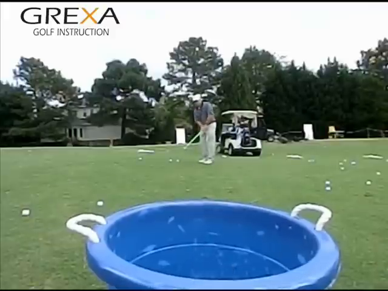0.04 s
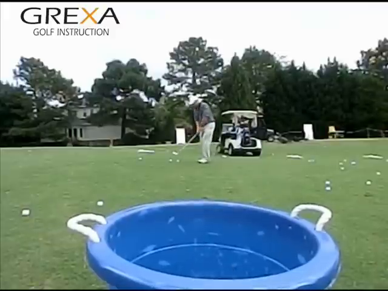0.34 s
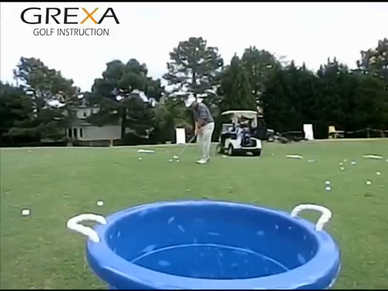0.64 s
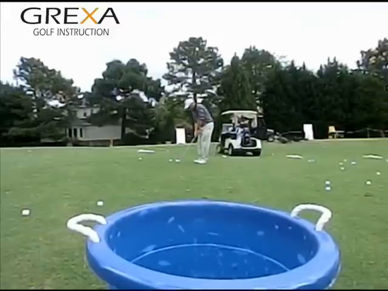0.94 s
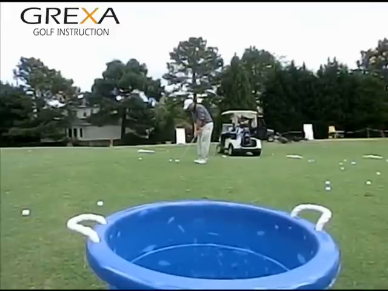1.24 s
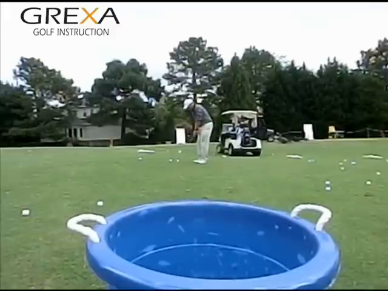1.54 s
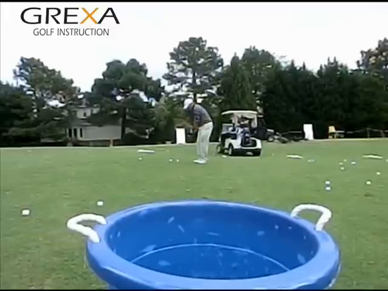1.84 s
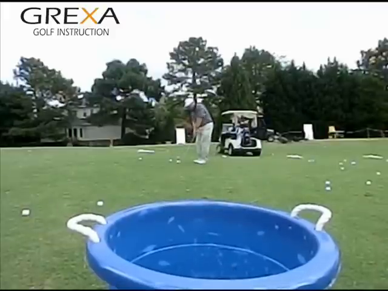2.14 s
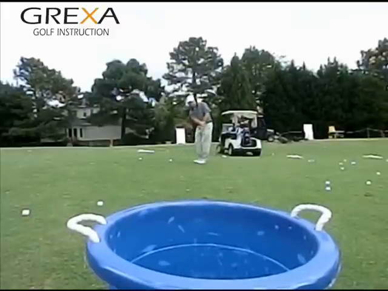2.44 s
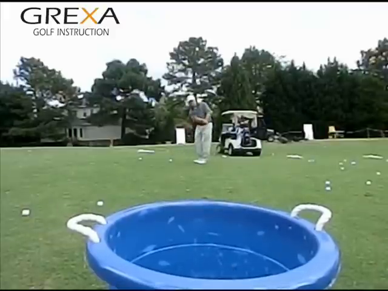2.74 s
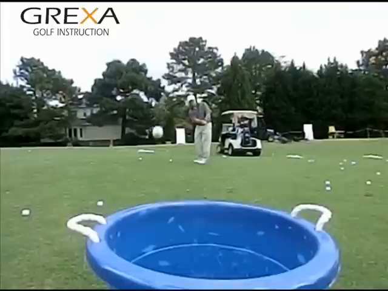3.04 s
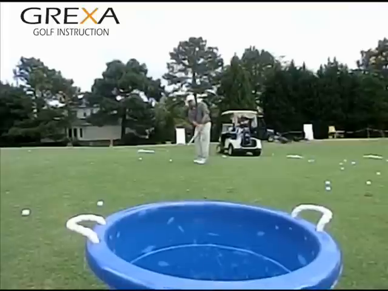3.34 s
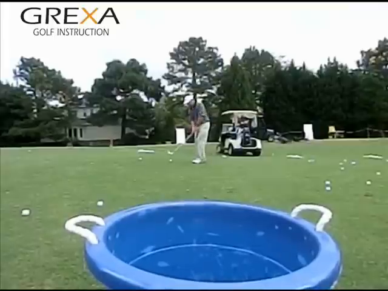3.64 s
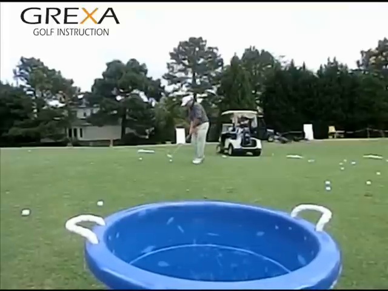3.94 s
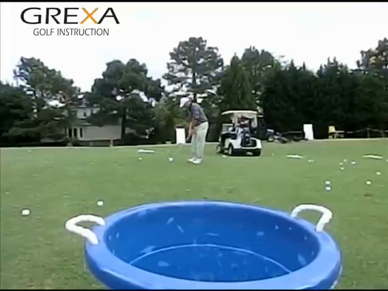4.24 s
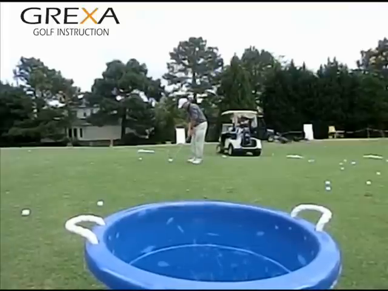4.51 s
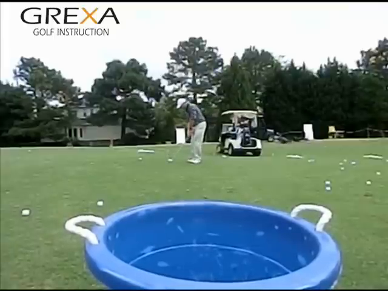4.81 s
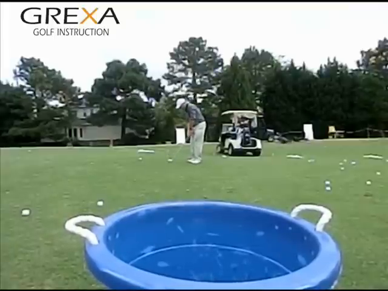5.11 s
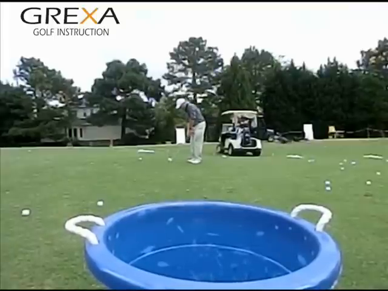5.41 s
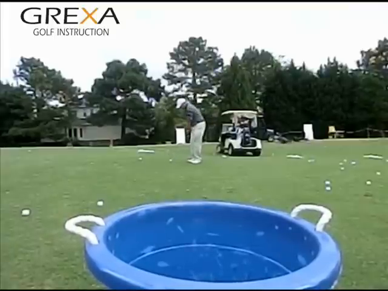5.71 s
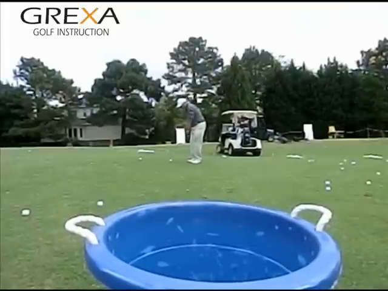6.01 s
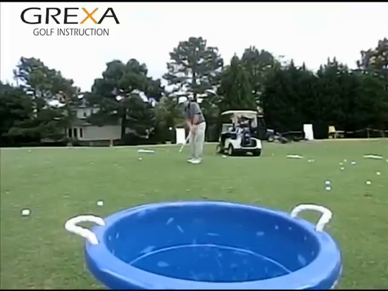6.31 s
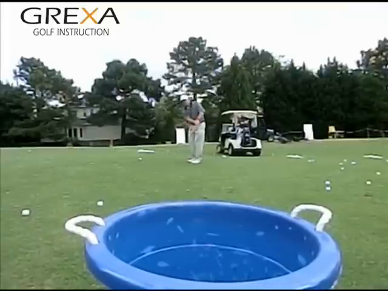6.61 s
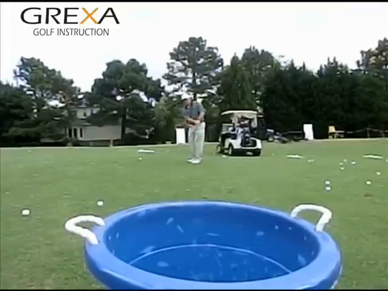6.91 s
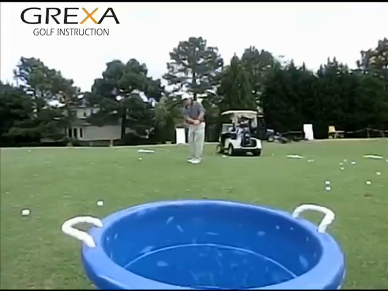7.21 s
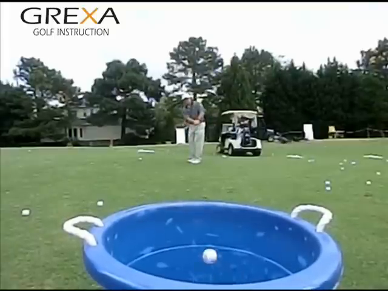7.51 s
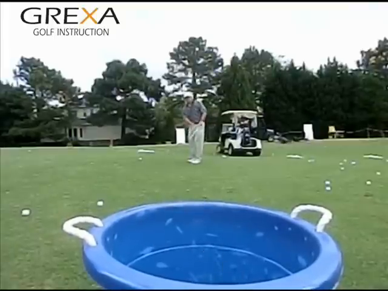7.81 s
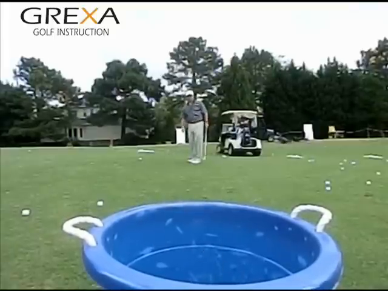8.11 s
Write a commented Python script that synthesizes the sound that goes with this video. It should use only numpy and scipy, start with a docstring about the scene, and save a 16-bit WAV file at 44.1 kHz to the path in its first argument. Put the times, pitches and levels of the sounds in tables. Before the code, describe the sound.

Outdoors on quiet grass, golf balls land in a plastic tub right by the microphone. After some opening hollow bounces, a distant club clicks twice, a few seconds apart, and each shot ends in a loud, booming knock. The first ball rumbles around the wall before settling; the second hits harder and bounces briefly. A soft breeze, insects and faint birds continue underneath.

```python
"""Golf chips into a plastic tub

A club clicks; a second later the ball slams into a tub close to the camera, bounces and rattles,
ringing its wall and floor. One ball circles the wall before it drops. Light wind, insects and
whistling birds lie behind. The slams overload the camera and push its gain down."""
import sys
import numpy as np
from scipy import signal
from scipy.fft import rfft, irfft, next_fast_len
from scipy.io import wavfile
from scipy.ndimage import uniform_filter1d, map_coordinates

SR = 44100
rng = np.random.default_rng(int(sys.argv[2]) if len(sys.argv) > 2 else 0)


def digitize_waveform(pressure):
    """Quantize a signal to 16-bit integers and store it at the path in sys.argv[1].

    Rows of a 2-D input are taken as channels; values are limited to [-1, 1].
    """
    field = np.atleast_2d(pressure).T
    bounded = np.clip(field, -1, 1)
    quanta = np.round(bounded * 32767).astype(np.int16)
    wavfile.write(sys.argv[1], SR, quanta)


N = 359415

# left-right coherence of diffuse and of close sound: (frequency [Hz], coherence [1])
DIFFUSE = [(60, 0.4), (150, 0.6), (380, 0.39), (950, 0.95), (2380, 0.56), (5980, 0.32), (15000, -0.66)]
NEAR = [(200, 1), (1500, .97), (4000, 0.9), (12000, 0.42)]
# spectrum of contact crack and brushed grass: (frequency [Hz], level [dB])
CRACK_SPECTRUM = [(800, -55), (2200, 4), (4500, 1), (6500, -2.5), (11000, -2.5), (15500, -8.5)]


def amp(db):
    """Decibels to gain."""
    return 10 ** (np.asarray(db) / 20)


def unit(x):
    """Scale to rms 1."""
    return x / np.sqrt(np.mean(x ** 2) + 1e-20)


def unit_onset(x):
    """Scale to rms 1 over the first 20 ms."""
    return x / np.sqrt(np.mean(x[..., :SR // 50] ** 2) + 1e-20)


def log_interp(points, hz):
    """Interpolate (Hz, value) points on a log frequency axis."""
    knot_hz, values = np.transpose(points)
    return np.interp(np.log(hz + 1), np.log(knot_hz + 1), values)


def wobble(rate_hz):
    """Smooth random curve with knots at rate_hz."""
    knots = rng.standard_normal(int(N * rate_hz / SR) + 4)
    return map_coordinates(knots, [np.arange(N) * rate_hz / SR])


def filtered(x, response):
    """Zero-phase filter with gain response(hz)."""
    n = x.shape[-1]
    padded = next_fast_len(n + 4096)
    return irfft(rfft(x, padded) * response(np.fft.rfftfreq(padded, 1 / SR)), padded)[..., :n]


def noise(spectrum, coherence, size=N):
    """Stereo noise of rms 1 with given spectrum and coherence."""
    def mid_side(hz):
        angle = np.arccos(np.clip(log_interp(coherence, hz), 0, 1)) / 2
        return amp(log_interp(spectrum, hz)) * [np.cos(angle), np.sin(angle)]
    mid, side = filtered(rng.standard_normal((2, size)), mid_side)
    return unit(np.array([mid + side, mid - side]))


def add(track, start_s, sound):
    """Mix sound into track at start_s."""
    part = track[:, max(0, round(start_s * SR)):][:, :sound.shape[-1]]
    part += sound[:, :part.shape[-1]]


def lawn(air_db=-52, insects_db=-63, twitter_db=-72):
    """Even rush of open air, shrill insects and a high twitter that comes and goes."""
    # spectra: (frequency [Hz], level [dB])
    air_spectrum = [(150, -28), (250, -6), (510, -12.5), (576, -16.5), (860, -11), (1500, -12.5),
                    (5830, -28), (7310, -29), (8850, -29.5), (14700, -31), (16000, -37.5)]
    insect_spectrum = [(6000, -34.5), (6900, -14.5), (7300, -10.5), (7700, -16.5), (8600, -28.5),
                       (9500, -42.5)]
    twitter_spectrum = [(7400, -42), (8000, 3.5), (8300, -1), (8700, -8), (9300, -38.5)]
    air = amp(air_db + .13 * wobble(2.6)) * noise(air_spectrum, DIFFUSE)
    insects = amp(insects_db + .55 * wobble(2.3) + wobble(50)) * noise(insect_spectrum, DIFFUSE)
    twitter = amp(twitter_db + 3.8 * wobble(13)) * noise(twitter_spectrum, DIFFUSE)
    return air + insects + twitter


def wind(flutter_db=2):
    """A light breeze rumbles on the microphone, with a few sharper puffs."""
    # breeze strength: (time [s], level [dB])
    strength = [(0, -34), (.35, -41), (1.08, -35.5), (1.5, -41), (1.8, -32.5), (2.35, -31.5), (2.75, -31),
                (2.95, -36), (3.25, -35.5), (3.6, -38), (4.5, -44), (4.85, -34), (5.7, -38), (5.95, -31.5),
                (6.42, -37.5), (6.6, -27), (6.97, -44.5), (8.15, -39)]
    # puffs: (time [s], level [dB], Gaussian sigma [s])
    puffs = [(1.744, -25.5, 0.0076), (1.857, -26, 0.0047), (1.964, -30.5, 0.0073), (2.741, -23, 0.041),
             (3.033, -32.5, 0.0064), (6.212, -21, 0.002)]
    # spectra: (frequency [Hz], level [dB])
    rumble_spectrum = [(12, -29), (25, -8.5), (60, 3), (100, 2), (160, -8), (230, -11.5), (300, -23.5),
                       (450, -42), (900, -90), (2000, -120)]
    puff_spectrum = [(40, -16.5), (140, 5), (250, -7), (450, -23), (900, -49), (3000, -120)]
    t = np.arange(N) / SR
    breeze_gain = amp(np.interp(t, *np.transpose(strength)))
    rumble = unit(amp(flutter_db * wobble(35)) * noise(rumble_spectrum, DIFFUSE))
    puff_gain = sum(amp(db) * np.exp(-((t - at_s) / sigma_s) ** 2 / 2) for at_s, db, sigma_s in puffs)
    return breeze_gain * rumble + puff_gain * noise(puff_spectrum, DIFFUSE)


def whistle(length_s, start_hz, target_hz, glide_s, sag_hz_per_s, fade_db_per_s, edge_s=.03):
    """Pitch and gain of a whistle that glides onto its note, sags and fades."""
    t = np.arange(round(length_s * SR)) / SR
    hz = target_hz + (start_hz - target_hz) * np.exp(-t / glide_s) - sag_hz_per_s * t
    edges = np.clip(np.minimum(t, length_s - t) / edge_s, 0, 1)
    return hz, edges * amp(-fade_db_per_s * t)


def chirp(length_s, mid_hz, drop_hz=350, arch_hz=375):
    """Pitch and gain of a short note that arches over and drops."""
    u = np.linspace(-.5, .5, round(length_s * SR))
    return mid_hz - drop_hz * u - arch_hz * (2 * u) ** 2, np.sqrt(np.abs(np.cos(np.pi * u)))


def birds(trees_t60_s=.38, gain_db=-5):
    """Thin whistles and chirps, raspy where they slide down, smeared by trees round the lawn."""
    # whistles: (start [s], length [s], relative level [dB])
    rising = [(.02, 0.22, -53), (5.125, 0.31, -51.5), (6.955, 0.4, -51)]
    falling = [(1.645, 0.67, -50), (7.63, .6, -54)]
    # their shapes: (start [Hz], target [Hz], glide [s], sag [Hz/s], fade [dB/s])
    rise = (3170, 4120, .068, 680, 34)
    fall = (6150, 4700, .04, 10, 11)
    # chirps: (middle [s], length [s], pitch [Hz], relative level [dB])
    chirps = [(1.355, .045, 8000, -53), (5.25, .055, 7850, -55), (6.425, .05, 4420, -52),
              (7.16, .07, 8520, -56), (7.28, .1, 4470, -64)]
    notes = [(at_s, db, *whistle(length_s, *rise)) for at_s, length_s, db in rising]
    notes += [(at_s, db, *whistle(length_s, *fall)) for at_s, length_s, db in falling]
    notes += [(mid_s - length_s / 2, db, *chirp(length_s, hz)) for mid_s, length_s, hz, db in chirps]
    song, t = np.zeros((1, N)), np.arange(SR // 2) / SR
    modulation = np.array([1 + .005 * wobble(70), amp(3.6 * wobble(50)), wobble(1100)])
    for at_s, db, hz, gain in notes:
        jitter, flutter, rasp = np.roll(modulation, -round(at_s * SR), axis=1)[:, :len(hz)]
        downslide = np.clip(-np.gradient(hz) * SR / 15000, 0, 1)
        pitch_hz = hz * jitter + 260 * downslide * rasp
        tone = np.sin(2 * np.pi * np.cumsum(pitch_hz) / SR)
        add(song, at_s, (amp(db) * gain * flutter * tone)[None])
    tail = rng.standard_normal((2, len(t))) * amp(-60 * t / trees_t60_s)
    reverb = signal.fftconvolve(song, tail / np.linalg.norm(tail[0]), axes=1)[:, :N]
    return amp(gain_db) * (song + reverb)


def club(head_hz=2300, head_t60_s=.018, click_t60_s=.012, grass_db=-22, grass_t60_s=.12):
    """The club clicks on the ball, rings briefly and brushes the grass."""
    # strokes: (time [s], level [dB], head ring re click [dB])
    strokes = [(2.3327, -25.5, -8), (2.885, -39, -4), (6.3526, -22, -5.5)]
    # (frequency [Hz], level [dB])
    click_spectrum = [(300, -36), (1000, 10), (3500, 1.5), (6000, 0.5), (10000, 6), (15500, -3)]
    out, t = np.zeros((2, N)), np.arange(SR // 5) / SR
    for at_s, db, ring_db in strokes:
        click = noise(click_spectrum, NEAR, len(t)) * amp(-60 * t / click_t60_s)
        ring = amp(ring_db - 60 * t / head_t60_s) * np.sin(2 * np.pi * head_hz * t)
        grass = noise(CRACK_SPECTRUM, DIFFUSE, len(t)) * amp(grass_db - 60 * t / grass_t60_s)
        add(out, at_s, amp(db) * (click + ring + grass))
    return out


def divot(at_s=2.311, level_db=-27.5, t60_s=.15):
    """On one swing the club thumps the ground just before the ball."""
    # (frequency [Hz], level [dB])
    thump_spectrum = [(50, -1.5), (200, -0.5), (350, -6.5), (600, -9), (1500, -16), (5000, -49),
                      (15000, -41)]
    out, t = np.zeros((2, N)), np.arange(SR // 5) / SR
    add(out, at_s, noise(thump_spectrum, NEAR, len(t)) * amp(level_db - 60 * t / t60_s))
    return out


def rim_resonances(x, surge_sigma_s=.018, surge_width=.33):
    """Waves run both ways round the rim: as the ball circles, one comb rises and another falls."""
    # strongest wall resonance: (time [s], frequency [Hz])
    peak_track = [(3.45, 520), (3.55, 980), (3.8, 630), (3.92, 900), (4, 720), (4.07, 1000), (4.16, 740),
                  (4.38, 615), (4.78, 590)]
    # surges around it: (time [s], boost [dB])
    surges = [(3.66, 2), (3.84, 4.5), (4.05, 11), (4.385, 5.5), (4.6, 6), (4.77, -0.5)]
    hz, t, spectrum = signal.stft(x, SR, nperseg=1024, noverlap=768)
    hz = hz[:, None]
    rising = np.cos(2 * np.pi * (hz - 2100 * t) / 560)
    falling = np.cos(2 * np.pi * (hz + 1700 * t) / 430)
    combs_db = np.clip(hz / 900, 0, 1) * (3.8 * rising + 3 * falling)
    offset = hz / np.interp(t, *np.transpose(peak_track)) - 1
    peak_db = 8.5 * np.exp(-(offset / .09) ** 2)
    surge_db = sum(db * np.exp(-((t - at_s) / surge_sigma_s) ** 2 / 2) for at_s, db in surges)
    gain = amp(combs_db + peak_db + surge_db * np.exp(-(offset / surge_width) ** 2))
    return signal.istft(spectrum * gain, SR, nperseg=1024, noverlap=768)[1][:, :N]


def roll_envelope(attack_s=.006, skid_s=.05, loss_db_per_s=2, stop_db_per_s=259):
    """Each roll starts with a skid, slowly loses force and stops."""
    # rolls: (start [s], end [s], level [dB], skid boost [dB])
    rolls = [(-.03, 0.015, -32, 4), (0.135, .2, -42, 12.5), (3.368, 4.779, -29, 17.5),
             (4.853, 4.928, -41, 11.5), (7.361, 7.664, -35.5, 27)]
    t, envelope = np.arange(N) / SR, np.zeros(N)
    for start_s, end_s, db, skid_db in rolls:
        age_s = np.maximum(t - start_s, 0)
        lost_db = loss_db_per_s * age_s + stop_db_per_s * np.maximum(t - end_s, 0)
        attack = np.minimum(age_s / attack_s, 1)
        envelope += attack * amp(db + skid_db * np.exp(-age_s / skid_s) - lost_db)
    return envelope


def rolling(bumps_db=2, grit_db=4.5, grit_hz=2400):
    """The dimpled ball rumbles along the wall and crunches over grit."""
    # (frequency [Hz], level [dB])
    roll_spectrum = [(70, -25), (120, -9.5), (200, -2), (370, -6.5), (620, 0), (900, -3), (1300, -6.5),
                     (1700, -11.5), (2300, -19.5), (4500, -27), (9000, -34), (15000, -37)]
    rumble = rim_resonances(noise(roll_spectrum, NEAR))
    treble = filtered(rumble, lambda hz: 1 / (1 + (grit_hz / (hz + 1)) ** 4))
    crunch = unit(amp(grit_db * (wobble(300) + .4 * wobble(50))))
    return roll_envelope() * amp(bumps_db * wobble(70)) * unit(rumble - treble + treble * crunch)


def crack(t, buzz_t60_s, buzz_db=-20, tick_db=3, tick_t60_s=.003, chatter_t60_s=.026):
    """First touch ticks; the thin plastic chatters against the ball, then buzzes faintly."""
    tick = amp(tick_db - 60 * t / tick_t60_s)
    roughness = amp(3 * np.interp(t, np.linspace(0, t[-1], 300), rng.standard_normal(300)))
    chatter = (1 - np.exp(-t / .00098)) * amp(-60 * t / chatter_t60_s)
    buzz = amp(buzz_db - 60 * t / buzz_t60_s)
    return unit_onset(noise(CRACK_SPECTRUM, NEAR, len(t)) * (tick + roughness * (chatter + buzz)))


def tub_knocks(rattle_db=1, thud_db=4, spot_db=9, floor_below_hz=350, boom_attack_s=.00095):
    """Each contact cracks, rings the wall at new strengths and booms the tub's floor."""
    # hits: (time [s], level [dB], boom re knock [dB], crack re knock [dB], base t60 [s], spot [Hz])
    hits = [(.086, -15, 0, -14, .16, 820), (.1115, -14.5, -3.5, -15, 0.1, 740),
            (.374, -24, -1.5, -11, 0.073, 840), (.56, -23.5, -10, -16, .05, 547),
            (.64, -31.5, -1, -14, 0.094, 1040), (.945, -40.5, -2, -16, 0.13, 587),
            (3.2895, -6, -15.5, -20.5, 0.085, 745), (3.344, -7.5, 3, -11, 0.092, 890),
            (3.404, -17.5, -5.5, -15, 0.17, 580), (3.427, -17.5, -0.5, -8, 0.085, 600),
            (3.461, -23.5, 1, -14.5, 0.15, 563), (3.544, -32, -2, -9, 0.11, 720),
            (3.9583, -29.5, -0.5, -8.5, 0.12, 641), (4.292, -27, -3.5, -10.5, 0.13, 810),
            (4.338, -27.5, -3, -18, 0.087, 640), (4.82, -18, -3, -18, 0.11, 940),
            (4.975, -27, -3.5, -17.5, 0.067, 715), (5.124, -28, -8, -10.5, 0.073, 600),
            (5.32, -32.5, 2.5, -11, 0.087, 670), (5.565, -41.5, 1.5, -6, .25, 730),
            (7.326, 1.5, -3, -14, .12, 670), (7.409, -13.5, 1, -7, 0.1, 830),
            (7.5571, -20, 3.5, -6, 0.21, 730), (7.907, -22.5, 2, -6, 0.089, 1040),
            (8.038, -27.5, -4, -16, .11, 767)]
    # dull touches: (time [s], level [dB])
    nudges = [(0.675, -36.5), (0.726, -41), (3.781, -29.5), (4.084, -29.5), (4.6389, -29.5), (4.665, -39),
              (4.723, -34.5), (4.838, -18), (5.091, -32.5), (5.164, -38), (5.394, -44), (7.442, -24),
              (7.577, -23.5), (8.06, -34.5), (8.094, -34)]
    # floor and wall modes: (frequency [Hz], level [dB], t60 / base t60 [1])
    tub_modes = [(143.2, -1, 1.3), (224.7, 7, 1.3), (286.5, 0.5, 1), (473, -0.5, .8), (506.7, 4.5, 1.2),
                 (590, 1.5, .9), (789, -14.5, .9), (812, -4.5, .8), (931, -4, 1.1), (1094, -2, .9),
                 (1292, -11, .9), (1394, -5.5, .9), (1606, -3.5, 1), (1880, -25.5, .5), (2380, -42, .7),
                 (2670, -27, .5), (3200, -18, .5), (3890, -9, .4)]
    # dense weak wall modes; thud of the whole tub: (frequency [Hz], level [dB])
    rattle_spectrum = [(200, -27), (420, 3), (900, -6.5), (1700, -4.5), (2200, -12), (3200, -22),
                       (5000, -23.5), (9000, -46.5)]
    thud_spectrum = [(25, -6.5), (80, -6.5), (170, 7.5), (320, 0.5), (480, -9.5), (1000, -52.5)]
    contacts = list(hits) + [(at_s, db, -5, -32, .097, 862) for at_s, db in nudges]
    out, t = np.zeros((2, N)), np.arange(SR // 5) / SR
    hz, mode_db, t60_ratio = np.transpose(tub_modes)[:, :, None]
    is_floor = hz[:, 0] < floor_below_hz
    for at_s, db, boom_db, crack_db, t60_s, spot_hz in contacts:
        # the struck spot favours modes near its own pitch
        favour_db = lambda f: spot_db * np.exp(-2 * np.log2((f + 1) / spot_hz) ** 2)
        strength, detune, polarity = rng.standard_normal((3, len(tub_modes), 1))
        tones = np.sign(polarity) * np.sin(2 * np.pi * hz * (1 + .025 * detune) * t)
        modes = tones * amp(mode_db + favour_db(hz) + 2 * strength - 60 * t / (t60_s * t60_ratio))
        weak_modes = filtered(noise(rattle_spectrum, NEAR, len(t)), lambda f: amp(favour_db(f)))
        rattle = unit_onset(weak_modes * amp(-60 * t / (.67 * t60_s)))
        thud = unit_onset(noise(thud_spectrum, NEAR, len(t)) * amp(-60 * t / (1.38 * t60_s)))
        knock = unit_onset(unit_onset(modes[~is_floor].sum(0)) + amp(rattle_db) * rattle)
        floor = unit_onset(modes[is_floor].sum(0)) + amp(thud_db) * thud
        boom = unit_onset(floor * (1 - np.exp(-t / boom_attack_s)))
        snap = crack(t, buzz_t60_s=1.52 * t60_s)
        add(out, at_s, amp(db) * (knock + amp(boom_db) * boom + amp(crack_db) * snap))
    return out


def scene():
    """Close tub over a quiet lawn; the right microphone hears a little more."""
    # microphone balance: (frequency [Hz], left minus right [dB])
    balance = [(60, -3.5), (400, -2.5), (1300, -3), (4400, -1.5), (8000, -1.7), (14000, 0.3)]
    mix = tub_knocks() + rolling() + club() + divot() + birds() + wind() + lawn()
    return filtered(mix, lambda hz: amp(np.outer([.5, -.5], log_interp(balance, hz))))


def gain_control(x, threshold_db=-21, max_cut_db=8.5, start_cut_db=11, release_db_per_s=3, lag_s=.018):
    """The gain starts low and creeps up; loud blows pull it down fast."""
    power = np.abs(uniform_filter1d(np.mean(x ** 2, 0), size=441, origin=220))  # last 10 ms
    cut_db = np.clip(10 * np.log10(power + 1e-12) - threshold_db, 0, max_cut_db)
    cut_db[0] = start_cut_db
    release_db = release_db_per_s * np.arange(N) / SR
    held_db = np.maximum.accumulate(cut_db + release_db) - release_db
    pole = np.exp(-1 / (lag_s * SR))
    smooth_db = start_cut_db + signal.lfilter([1 - pole], [1, -pole], held_db - start_cut_db)
    return x * amp(-smooth_db)


def record(dry, ceiling=.96, cutoff_hz=15600):
    """Camera: automatic gain, clipping of the hardest slams, steep low-pass."""
    clipped = np.clip(gain_control(dry), -ceiling, ceiling)
    return filtered(clipped, lambda hz: 1 / (1 + (hz / cutoff_hz) ** 80))


dry = scene()
out = record(dry)
digitize_waveform(out)
```